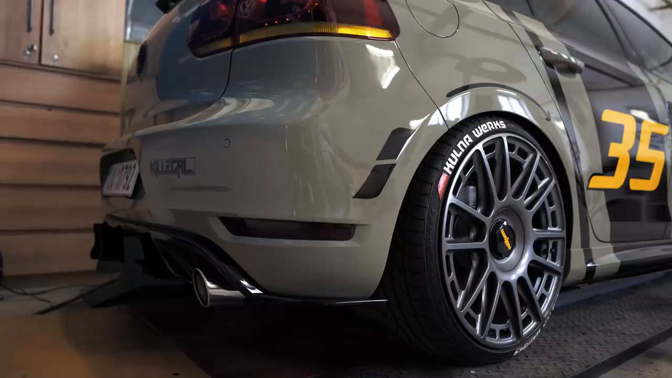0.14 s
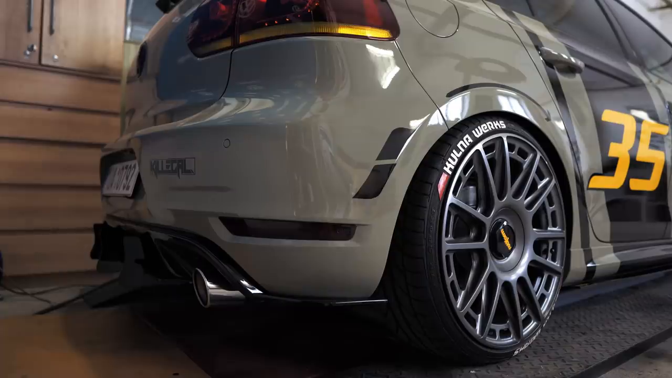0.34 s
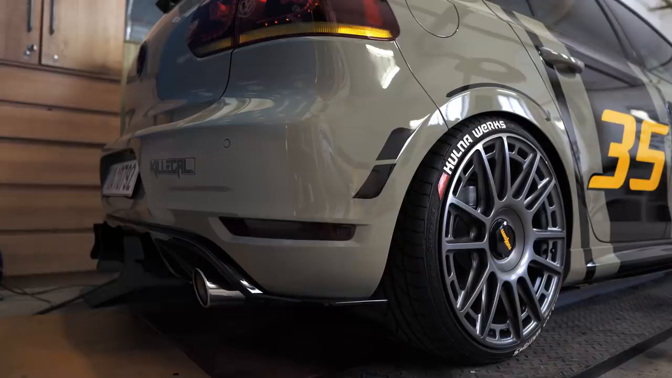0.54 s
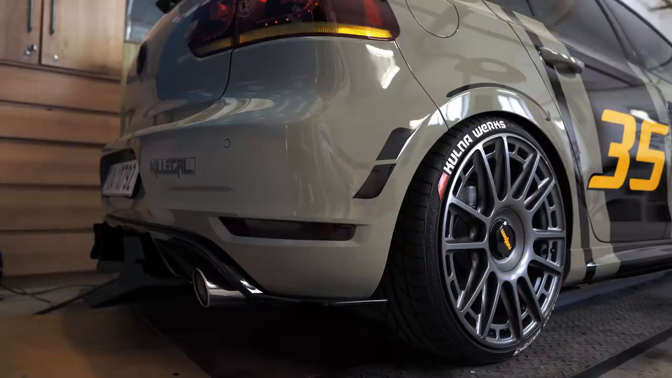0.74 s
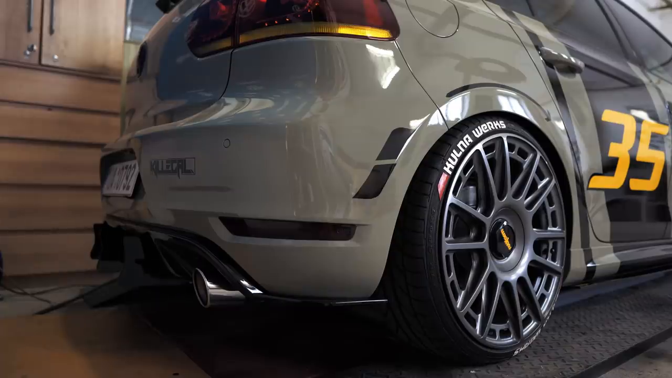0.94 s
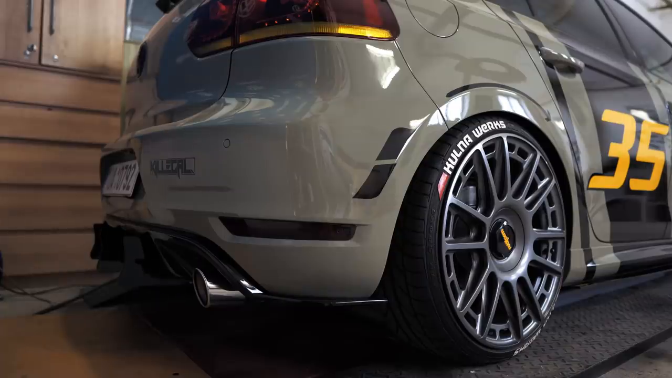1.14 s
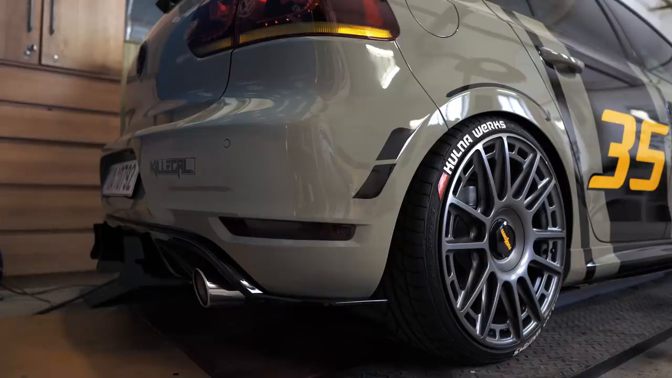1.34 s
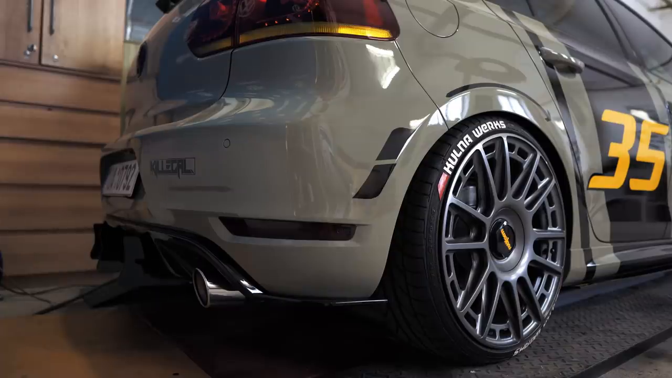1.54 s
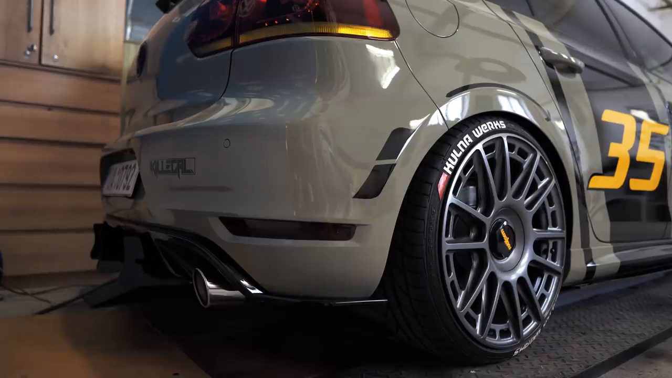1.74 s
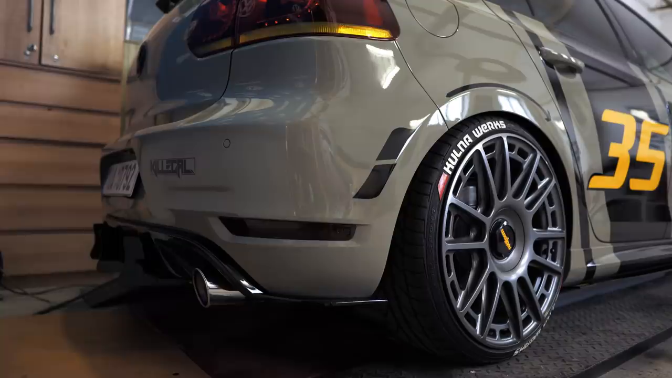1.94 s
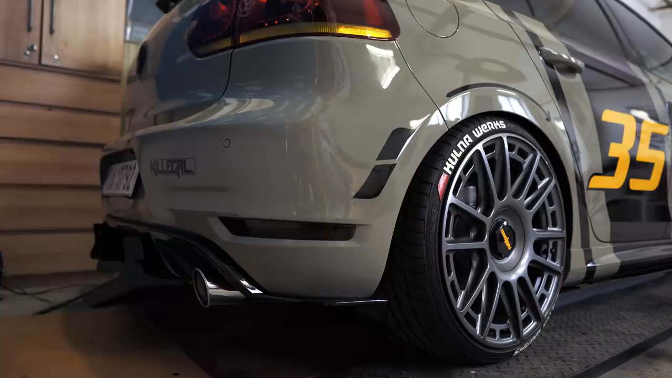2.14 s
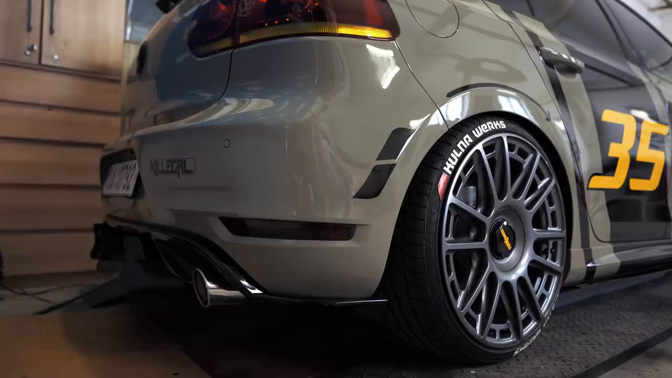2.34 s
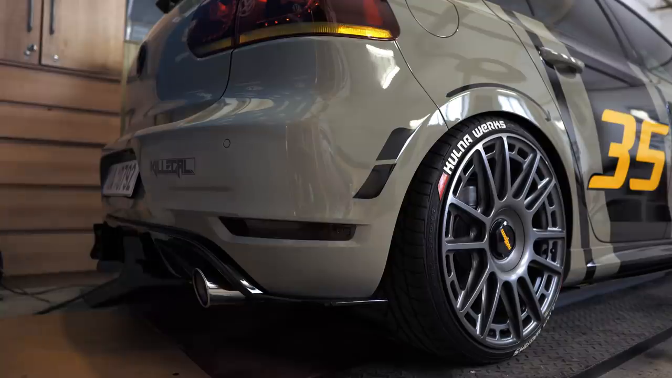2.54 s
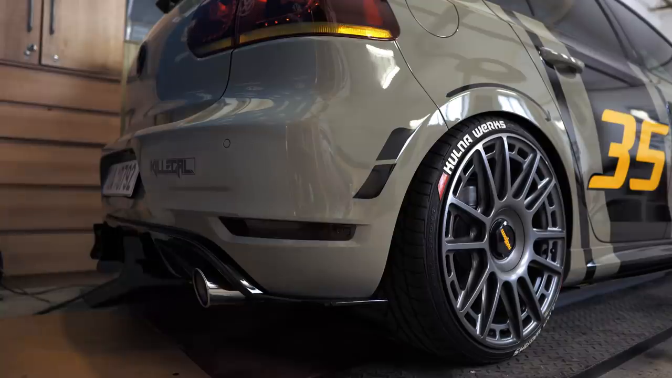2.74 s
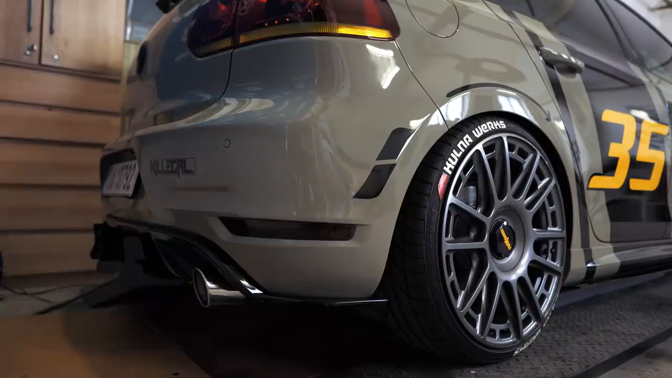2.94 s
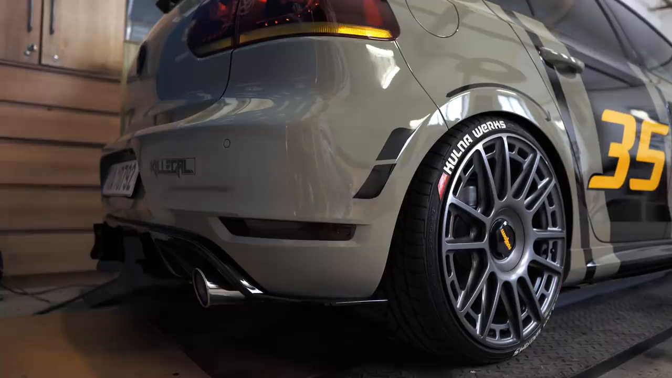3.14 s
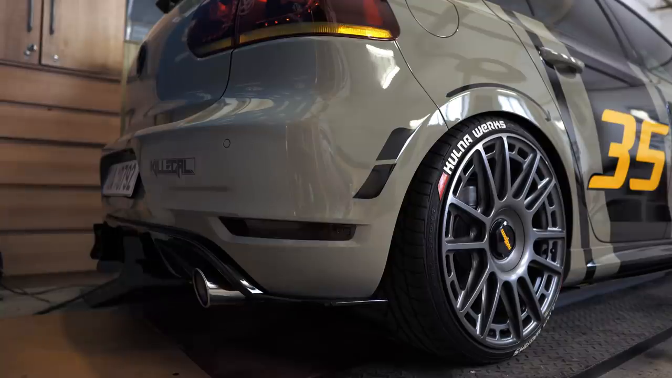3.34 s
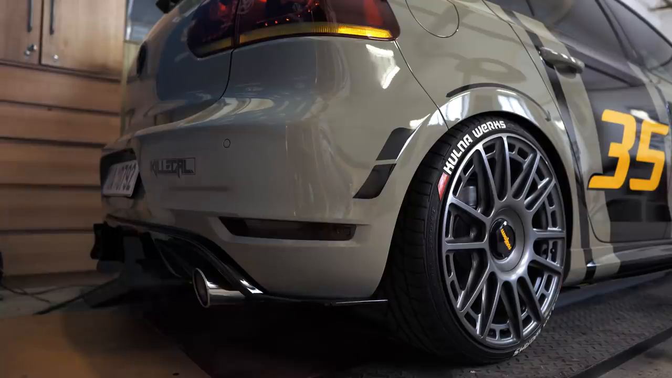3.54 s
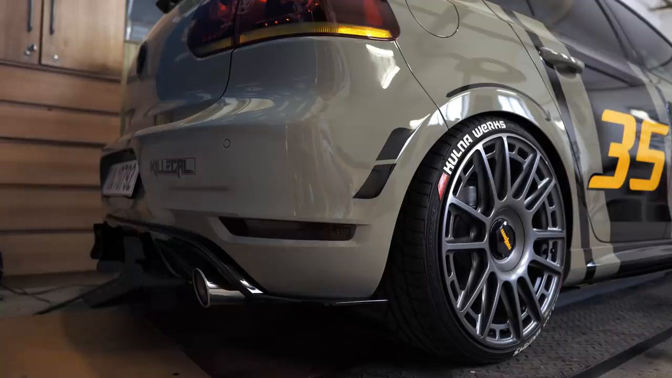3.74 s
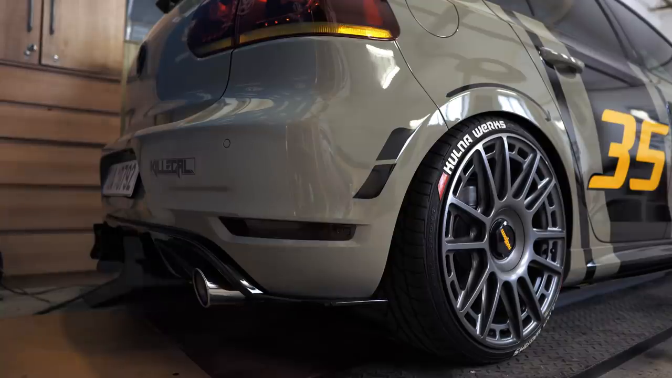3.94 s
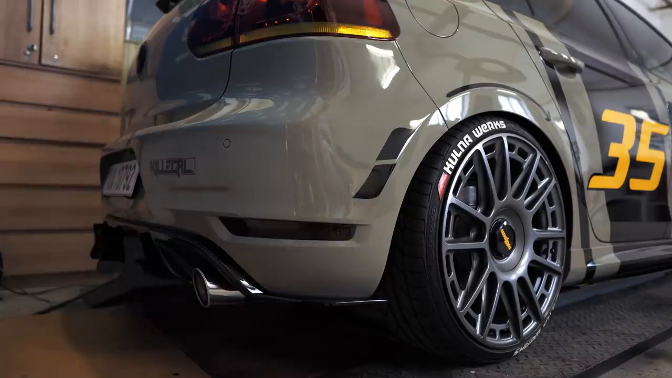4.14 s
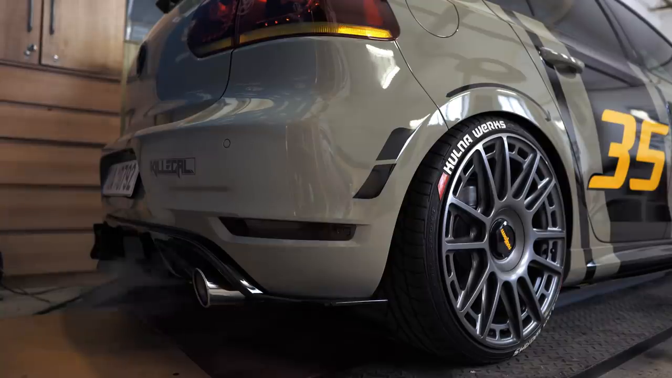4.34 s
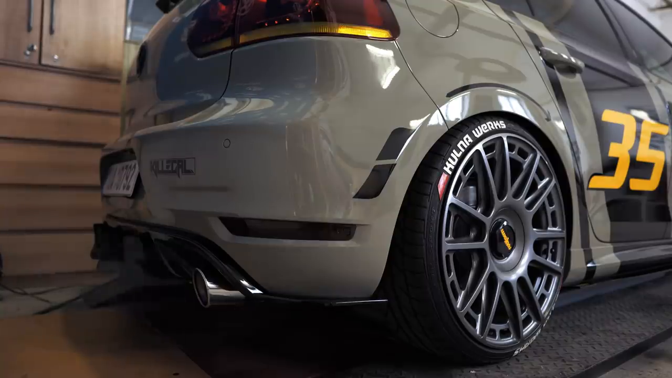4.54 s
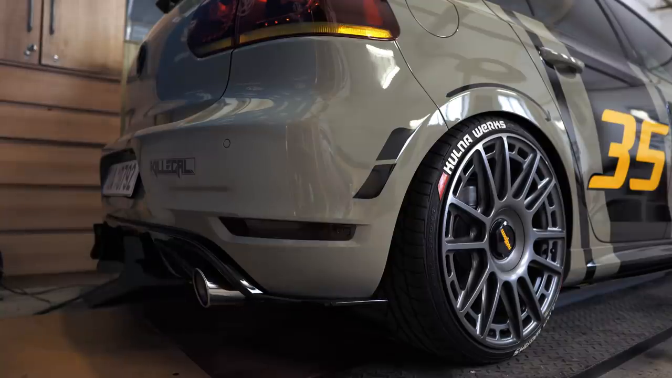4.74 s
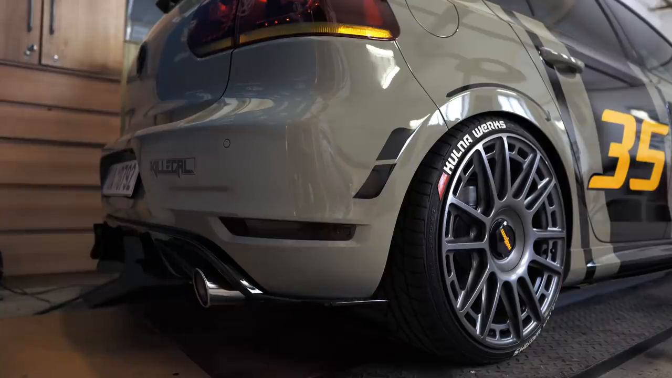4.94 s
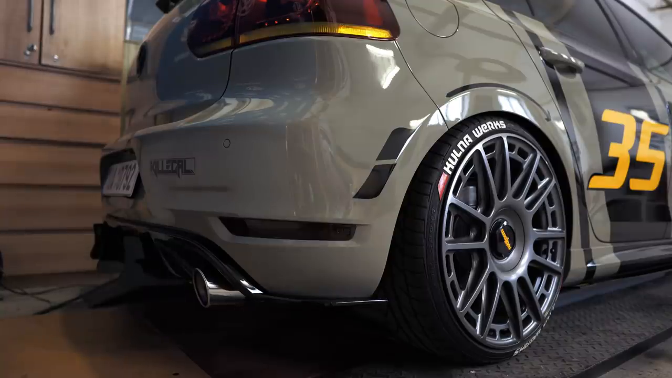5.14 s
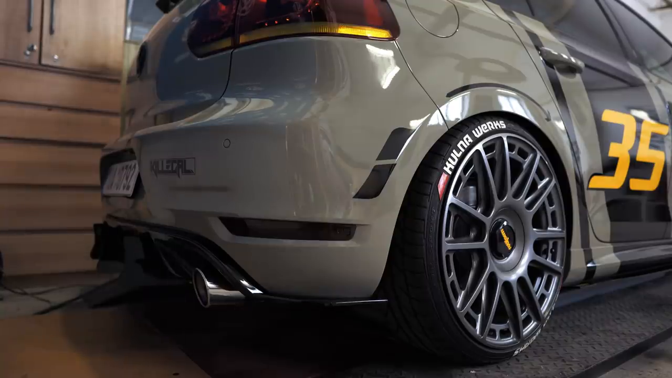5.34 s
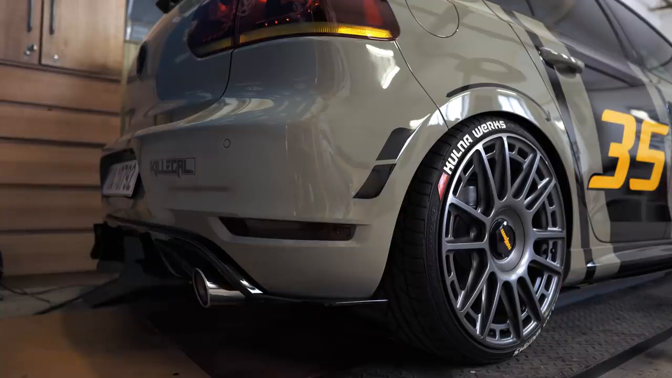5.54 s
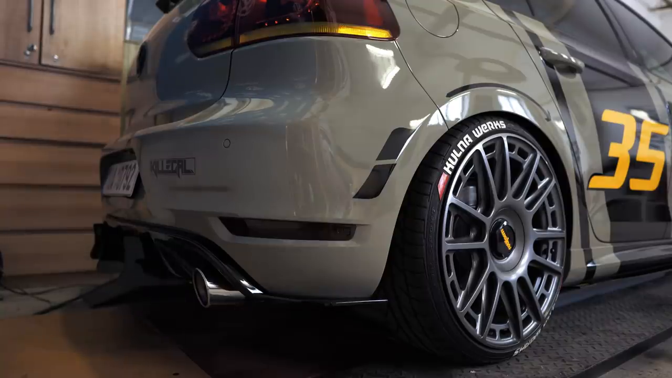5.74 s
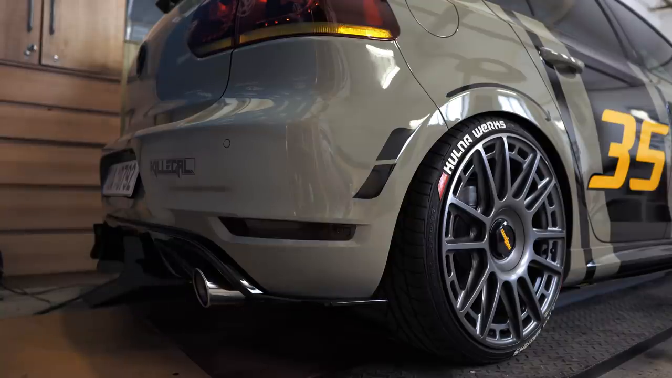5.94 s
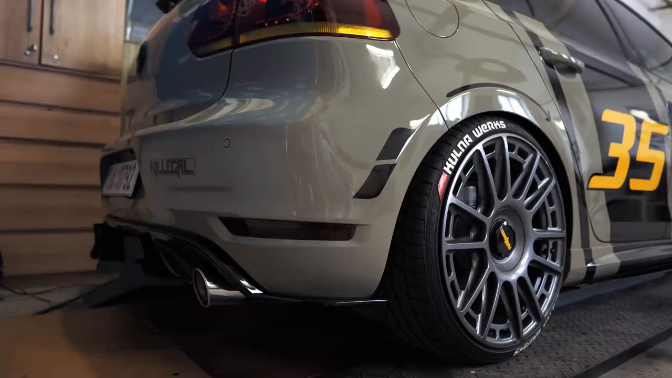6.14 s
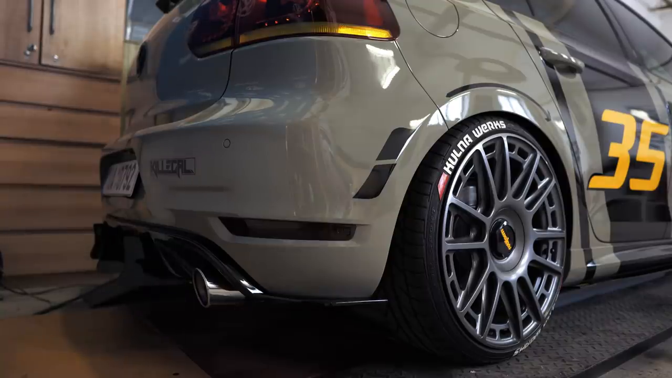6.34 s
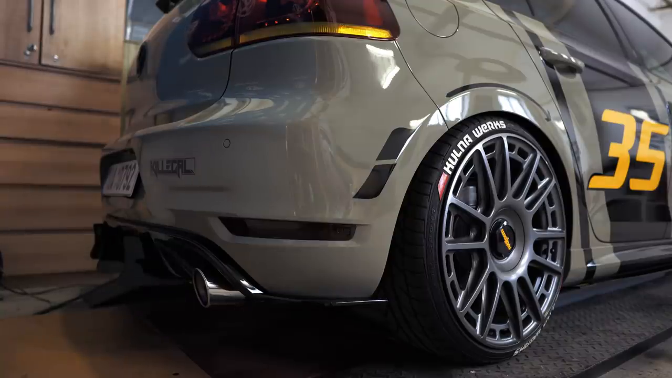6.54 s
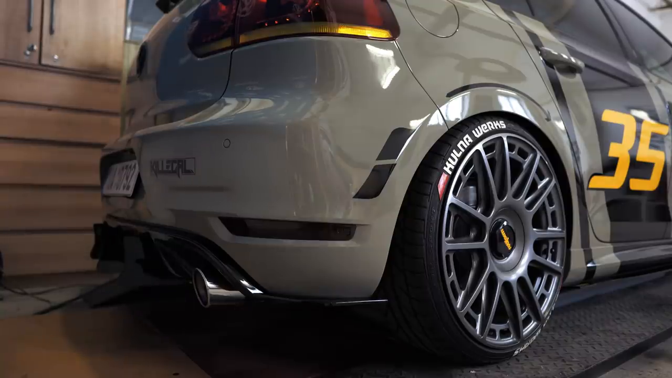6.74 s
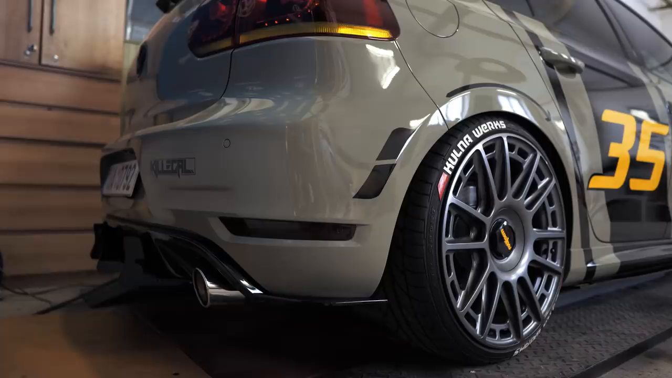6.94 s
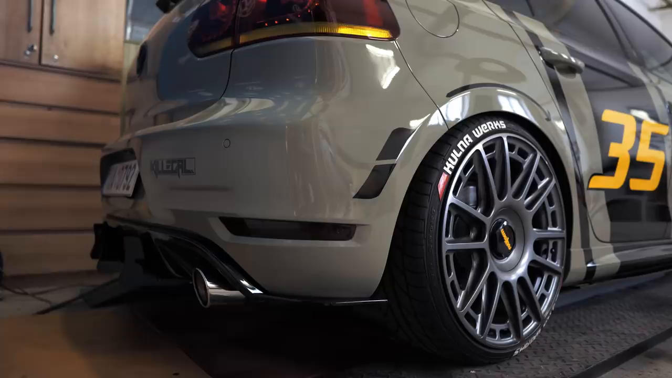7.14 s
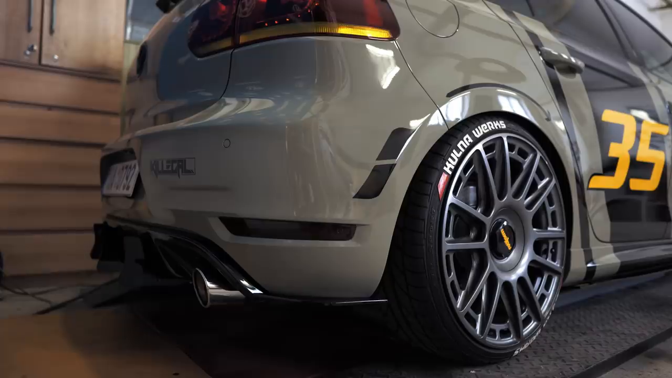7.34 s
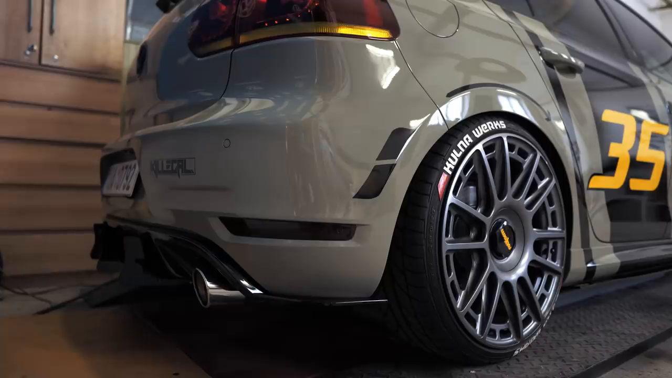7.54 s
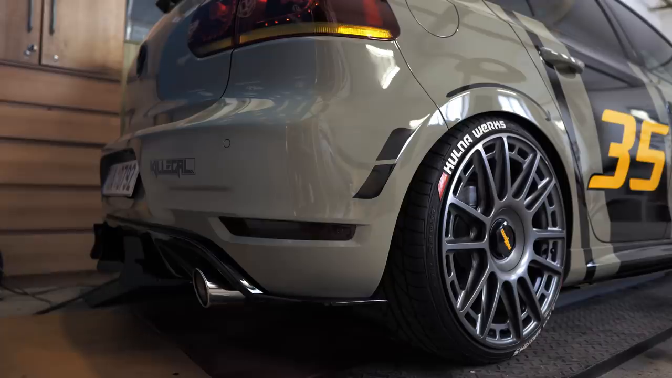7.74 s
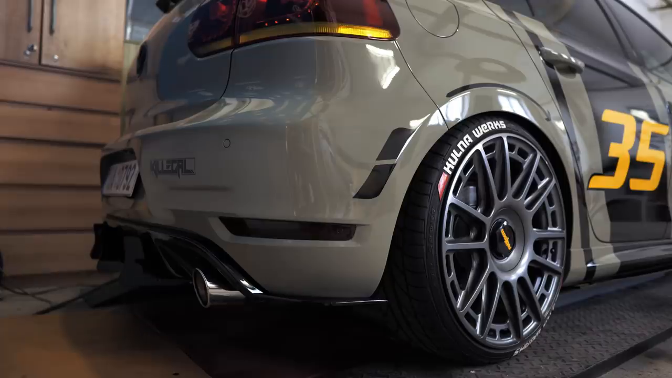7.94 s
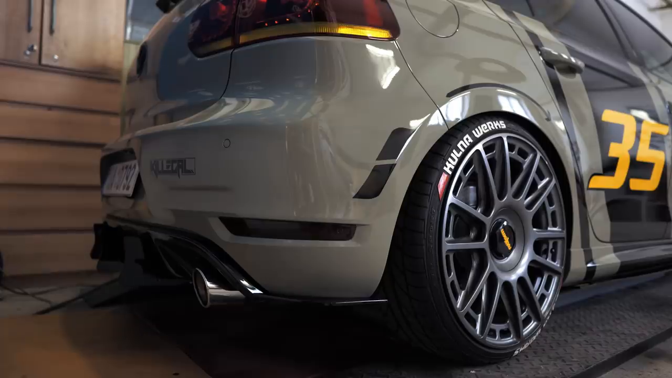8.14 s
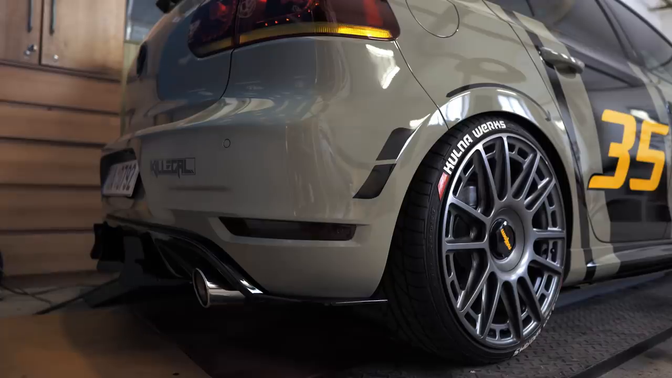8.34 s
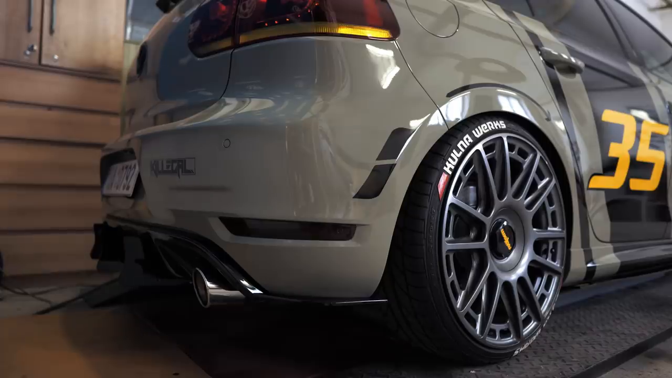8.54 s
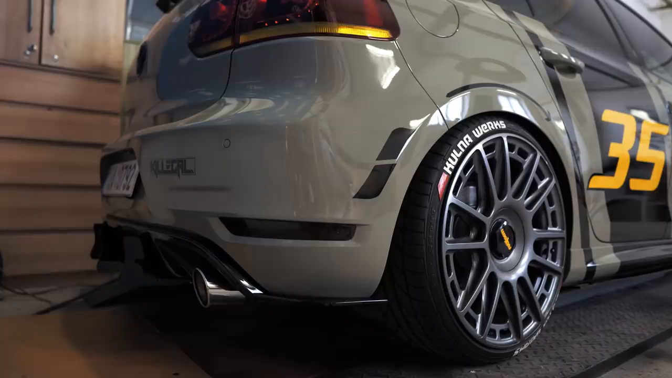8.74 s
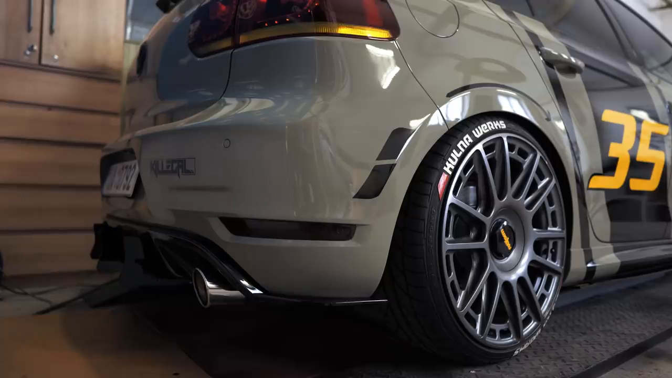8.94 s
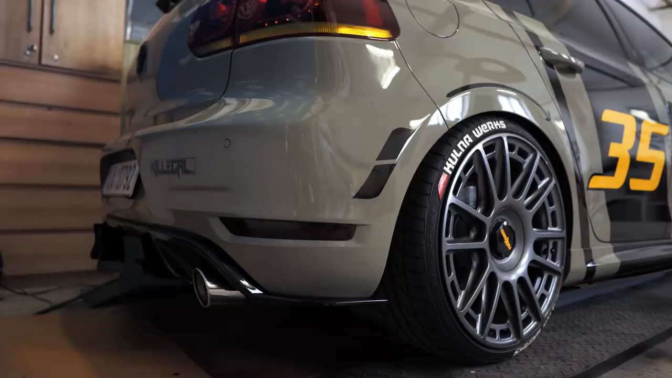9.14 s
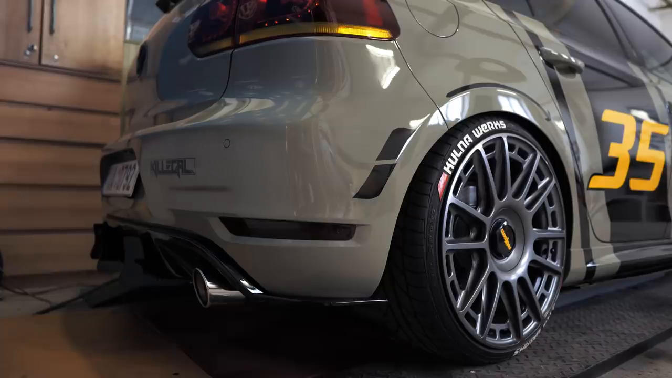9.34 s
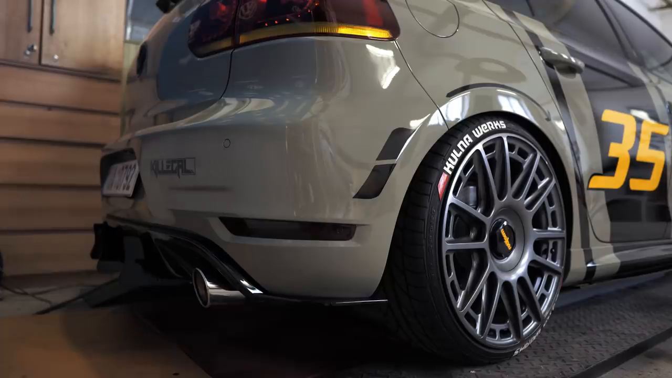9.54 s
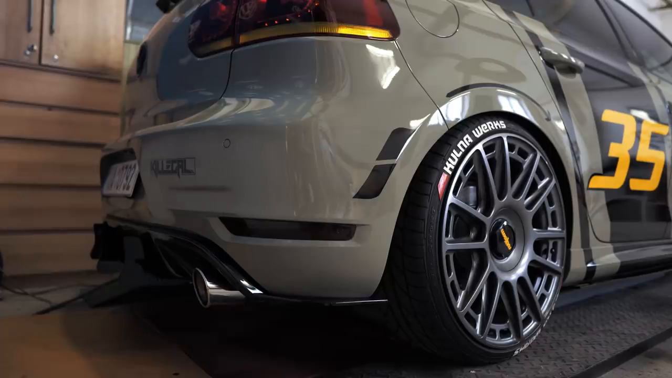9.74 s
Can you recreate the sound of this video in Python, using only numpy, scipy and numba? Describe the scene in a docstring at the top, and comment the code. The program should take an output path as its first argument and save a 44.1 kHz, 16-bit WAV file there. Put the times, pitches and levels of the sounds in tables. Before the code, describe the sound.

Close to a car's tailpipe in a walled yard, a four-cylinder engine is already falling from a rev, buzzing low with thin hiss and injector ticks. At 0.5 s a blip climbs raspily until 0.9, then sinks through burbles and dull pops around 1.1-1.5. At 1.85 the hardest blip surges much higher, growling and spitting sharp cracks at 2.3-2.5, then coasts smoother and softer. At 3.25 a huge backfire bangs, overloading the microphone; flame roars and flutters briefly and the echo fades over about a second beneath muffled pops. A gentler blip at 4.25-4.65 falls unevenly, another follows at 5.75-6.15 with stumbling crackles until 7. The engine settles into a low, slightly lumpy idle, sagging slowest near 8.4. A last blip at 8.65-9.05 rises, then burbles and pops downward to 10 s.

```python
"""Blipped turbo car with a backfire

A turbocharged four-cylinder car stands in a yard and is blipped five times, heard near its tailpipe.
Each firing rings the exhaust and lets out a puff of gas; off the throttle firings stumble and fuel pops.
One backfire bangs, flames and echoes round the yard, driving a limiter; between blips the engine sinks
towards idle. Gas hiss and ticking injectors fill the treble, and the walls return a soft, thin echo."""
import sys
import numpy as np
from scipy import signal
from scipy.fft import rfft, irfft
from scipy.io import wavfile
from scipy.ndimage import uniform_filter1d
from numba import njit

SR = 44100
rng = np.random.default_rng(int(sys.argv[2]) if len(sys.argv) > 2 else 0)


def log_audio(samples):
    """Write samples as a 16-bit WAV file to the path given in sys.argv[1]."""
    # one column per channel
    frames = np.atleast_2d(samples).T
    # limit to full scale, then quantise
    limited = np.clip(frames, -1, 1)
    pcm = np.round(limited * 32767).astype(np.int16)
    wavfile.write(sys.argv[1], SR, pcm)


N = 436590
T = np.arange(N) / SR  # time of each sample, s

# pedal blips, the first already over: (pressed [s], lifted [s], top firing rate before smoothing [Hz],
# coasting time constant [s], harshness climbing [dB], harshness coasting [dB], extra boom [dB])
BLIPS = [(-.5, -0.109, 66.64, 1.58, 3, 3.5, 2), (.487, 0.918, 85.9, 1.23, 2, 2, 1.5),
         (1.842, 2.338, 117.2, 1.68, 2, -5.5, -0.5), (4.252, 4.643, 69.87, 1.69, -2.5, 0, -1),
         (5.732, 6.164, 81.3, 1.29, 0.5, 0, 0), (8.645, 9.059, 82.52, 1.55, 1, 0.5, 1)]
# idle speed at which the governor catches the engine: (time [s], firing rate [Hz])
IDLE = [(.35, 51.98), (1.7, 51.18), (4.15, 44.35), (5.2, 48.3), (5.55, 45.56), (7.15, 44.79), (7.63, 42.63),
        (8.15, 37.13), (8.45, 36.76), (8.6, 41.8)]
# overrun, when fuel burns late and the firings stumble: (start [s], end [s], depth [0-1])
OVERRUNS = [(1.05, 1.66, 0.72), (2.36, 2.56, .7), (3.3, 4.13, 0.8), (4.83, 5.18, 0.77), (6.26, 7.09, .85),
            (9.2, 10, .75)]
# the cylinders get hardly any charge and the note goes soft: (start [s], end [s], depth [0-1])
FUEL_CUTS = [(.38, .52, 0.28), (1.6, 1.8, 0.73), (3.3, 3.58, 0.45), (4.08, 4.3, 0.37), (6.82, 7.19, 0.41),
             (9.22, 10, 0.32)]
# unevenness of combustion: (base [0-1], added on throttle [0-1], added in overrun [0-1])
STUMBLE = (0.13, -0.031, 0.79)

# voice levels relative to one another: (level at the reference firing rate [dB],
# growth with speed [dB/octave], on throttle [dB], in overrun [dB], in a fuel cut [dB], per harshness [dB/dB])
BARK_LEVEL = (-19.5, 5, 0, -4.5, -6, 1.11)
RASP_LEVEL = (-33.5, 9, 1, -2.5, -12, 1.37)
HISS_LEVEL = (-44, 12, 0.37, -4, -1, 0.63)
TICK_LEVEL = (-51, 4, 1, -2.5, -15, 0.8)
# boom where a harmonic of the firings meets a resonance: (firing rate [Hz], relative level [dB])
DRONE = [(36.5, -16), (42, -14), (47, -12), (53, -11), (60, -15), (68, -8), (75, -11), (82, -11.5),
         (97, -7.5), (117, -6.5)]
# departure of the boom from the drone: (on throttle [dB], in overrun [dB], in a fuel cut [dB])
BOOM_SHIFT = (-1, -6.5, -8)

# exhaust resonances, from silencer volume to tailpipe: (frequency [Hz], width [Hz], relative level [dB])
SILENCER = [(43, 6.4, 5.5), (62, 25, 5.5), (84.3, 22, 13), (98.6, 4.1, 8)]
PIPE = [(132, 47, 2.5), (205.8, 20, 5), (232.5, 52, 1), (288.2, 16.2, 8.5), (330.9, 18.8, 8.5)]
TAILPIPE = [(425, 6, -13), (455.4, 24.6, 9.5), (524, 20, 3.5), (569, 49, 5.5), (615, 42, 9.5),
            (656, 19, 1.5), (721.5, 17, 8), (872, 34, -4), (943, 37, -3), (1001, 17, -7), (1244, 59, -11),
            (1480, 130, -10), (1586, 140, -12), (2080, 430, -4.5)]
# ringing of the injectors: (frequency [Hz], width [Hz], relative level [dB])
INJECTORS = [(3280, 1800, 6), (4240, 1400, -16), (5400, 260, 3), (6650, 280, -20), (8700, 420, 2),
             (9800, 300, -10), (12000, 1200, -8)]
# colour of the escaping gas: (frequency [Hz], relative level [dB])
HISS_COLOUR = [(1120, 3), (1900, -1), (2710, -3), (2960, -1.5), (3290, -3.5), (3990, -2), (4930, -7.5),
               (5490, -6.5), (5990, -8.5), (6600, -8.5), (7880, -10.5), (8840, -11.5), (10900, -20.5),
               (12700, -18.5), (15700, -24)]

# fuel popping in the exhaust: (time [s], relative thump [dB], relative crack [dB])
POPS = [(0.103, -23, -49), (0.815, -8.5, -33), (0.853, -14, -51), (1.063, -8.5, -45), (1.084, -15, -51),
        (1.171, -10.5, -50), (1.287, -4.5, -30.5), (1.48, -12, -50), (2.315, 7.5, -17.5), (2.345, -2, -25),
        (2.44, -1, -17.5), (2.526, -3.5, -21), (3.633, -9.5, -39), (3.736, -12.5, -72), (3.969, -18, -80),
        (4.012, -9.5, -40), (4.059, -20.5, -45), (4.377, -18, -56), (4.955, -24, -46), (5.099, -26, -42),
        (5.855, -18, -53), (6.301, -15, -54), (6.385, -18, -49), (6.488, -16.5, -41.5), (6.548, -16.5, -50),
        (6.729, -16, -49), (6.767, -11.5, -47), (8.791, -12.5, -40), (9.026, -9, -34), (9.271, -10, -56),
        (9.314, -11, -54), (9.373, -13.5, -52), (9.494, -11.5, -54)]
# the backfire: (time [s], relative level [dB])
BACKFIRE = (3.2497, 5.95)
# colour of the backfire and its echo: (frequency [Hz], relative level [dB])
BANG_COLOUR = [(88, -37), (150, 12.5), (193, 6.5), (226, -17), (269, 10.5), (308, 3), (428, 0.5),
               (670, 3.5), (1010, -4), (1700, -3), (2030, -8), (8220, -27.5), (12400, -26), (15600, -25)]
# dying away of the yard's echo: (frequency [Hz], time to fall 60 dB [s])
YARD_DECAY = [(100, 0.2), (500, 1), (1500, 1.0), (4000, 1), (8000, 0.98), (15000, 0.24)]

REFERENCE_HZ = 50  # firing rate at which the voice levels are set
FLYWHEEL_S, PEDAL_LEAD_S = 0.1475, 0.013  # smoothing of speed; load leads speed
PEDAL_S, MIXTURE_S = 0.19, 0.11  # slew of pedal and of fuelling
# near this firing rate and below, the firings come early and late by turns
LOPE_HZ, LOPE_S = 45.2, 0.00018
# turbulence in the tailpipe at the reference rate, and its growth with speed
CHURN_SHARE, CHURN_DB_PER_OCTAVE = 0.29, 7
# at the top of the highest blip a volley of late burns makes the pipes growl
VOLLEY_S, VOLLEY_BARK_DB, VOLLEY_RASP_DB = (2.32, 2.52), 8, 14  # (start, end), added levels
TOP_HZ = 15750  # final treble cutoff


def engine():
    """Firings ring silencer, pipe and tailpipe; a puff of turbulent gas follows each one."""
    hz, stumble, boom_db, bark_db, rasp_db, hiss_db, tick_db = controls()
    times, sizes, fronts = firings(hz, stumble, late=0.348, scatter_db=8.5, steady_db=3)
    pulses = unit(strikes(times, sizes))
    edges = unit(strikes(times, fronts))
    puffs = unit(fade(edges, decay_s=0.012))
    churn = unit(puffs * rng.standard_normal(N))
    # uneven burning adds turbulence to the clean pulses
    turbulence = (0.02 + stumble) * churn

    # the fronts are rounded, so the highest resonances are rung mostly by turbulence
    front_s = 0.00064
    rounded = fade(edges, decay_s=front_s) / (front_s * SR)
    churn_gain = CHURN_SHARE * undb(CHURN_DB_PER_OCTAVE * np.log2(hz / REFERENCE_HZ))
    rush = rounded + churn_gain * churn + 0.35 * turbulence

    silencer = body(SILENCER, low_hz=32.3, high_hz=108.3)
    pipe = body(PIPE, low_hz=154.2, high_hz=358.2, order=6)
    tailpipe = body(TAILPIPE, low_hz=377, high_hz=1706, order=5)
    boom = even(ring(pulses + turbulence, silencer), size=3600, hold=0.52)
    bark = even(ring(edges + turbulence, pipe), hold=0.41)
    rasp = even(ring(rush, tailpipe))
    exhaust = boom * undb(boom_db) + bark * undb(bark_db) + rasp * undb(rasp_db)

    hiss = even(noise(HISS_COLOUR, size=2 ** 19) * (1 + 0.067 * puffs))
    hiss = hiss * undb(hiss_db - 1.0) * share(hiss_db)
    return hiss + injectors(times) * undb(tick_db) - exhaust


def firings(hz, stumble, late, scatter_db, steady_db):
    """Firing times and strengths; stumbling shifts and scatters them, and a slow engine lopes."""
    turns = np.cumsum(hz) / SR  # firings so far
    count = np.arange(1, int(turns[-1]))
    chance = rng.standard_normal((len(count), 3)).T
    rough = np.clip(np.interp(count, turns, stumble), 0, 1)
    slack = np.minimum(LOPE_HZ / np.interp(count, turns, hz), 1)
    times = np.interp(count + late * rough ** 2 * np.tanh(chance[0]), turns, T)
    times = times + LOPE_S * slack ** 4 * (-1) ** count
    sizes = undb(scatter_db * rough * np.tanh(chance[1]))
    # the steepness of the front varies more than the volume of gas does
    fronts = sizes * undb((steady_db * slack + 1.2 * rough) * np.tanh(chance[2]))
    return times, sizes, fronts


def controls():
    """Pedal and fuelling set speed, stumbling and the levels of boom, bark, rasp, hiss and ticking."""
    hz, harsh_db, extra_db = revs()
    presses = [(pressed - PEDAL_LEAD_S, lifted, 1) for pressed, lifted, *_ in BLIPS]
    throttle = gate(presses, PEDAL_S)
    overrun, cut = gate(OVERRUNS, MIXTURE_S), gate(FUEL_CUTS, MIXTURE_S)

    octaves = np.log2(hz / REFERENCE_HZ)
    state = np.array([np.ones(N), octaves, throttle, overrun, cut, harsh_db])
    levels = np.array([BARK_LEVEL, RASP_LEVEL, HISS_LEVEL, TICK_LEVEL])
    bark_db, rasp_db, hiss_db, tick_db = levels @ state
    drone_db = np.interp(hz, *np.transpose(DRONE))
    boom_db = drone_db + extra_db + np.array(BOOM_SHIFT) @ np.array([throttle, overrun, cut])

    base, on_throttle, in_overrun = STUMBLE
    stumble = np.clip(base + on_throttle * throttle + in_overrun * overrun, 0, 1)
    volley = gate([(*VOLLEY_S, 1)], PEDAL_S / 2)
    bark_db = bark_db + VOLLEY_BARK_DB * volley
    rasp_db = rasp_db + VOLLEY_RASP_DB * volley
    return hz, stumble, boom_db, bark_db, rasp_db, hiss_db, tick_db


def revs():
    """Speed, harshness and extra boom: each blip climbs steadily, then coasts until idle catches it."""
    idle = np.interp(T, *np.transpose(IDLE))
    hz, harsh_db, extra_db = idle, np.zeros(N), np.zeros(N)
    for pressed, lifted, top_hz, coast_s, climb_db, coast_db, boom_db in BLIPS:
        start_hz = np.interp(pressed, T, hz)
        climb = np.interp(T, [pressed, lifted], [start_hz, top_hz])
        coast = np.maximum(idle, top_hz * np.exp(-np.maximum(T - lifted, 0) / coast_s))
        before, climbing = T < pressed, T < lifted
        hz = np.where(before, hz, np.where(climbing, climb, coast))
        harsh_db = np.where(before, harsh_db, np.where(climbing, climb_db, coast_db))
        extra_db = np.where(before, extra_db, boom_db)
    return smooth(hz, FLYWHEEL_S), smooth(harsh_db, FLYWHEEL_S), smooth(extra_db, FLYWHEEL_S)


def gate(rows, slew_s):
    """A control that rises to each row's depth at its start and falls at its end."""
    ramp = lambda t: np.clip(t / slew_s + 0.5, 0, 1)
    return sum(depth * ramp(T - start) * ramp(end - T) for start, end, depth in rows)


def injectors(times):
    """Bright ticking from the engine bay, blurred on its way round the car."""
    envelope = unit(fade(strikes(times, np.ones(len(times))), decay_s=0.0088))
    ticks = (0.45 + envelope) * rng.standard_normal(N)
    return even(ring(ticks, body(INJECTORS, low_hz=2400, high_hz=12800, order=2)))


def share(hiss_db, knee_db=-51):
    """Gain that holds gas hiss back below the knee and lets it into the treble in strong flow."""
    return 1 / np.sqrt(1 + undb(2 * (knee_db - hiss_db)))


def pops(thump_db, tail_db, crack_db, snap_db, whump_db):
    """Each pop strikes the whole exhaust; the fierce ones also spit a crack of gas and a low whump."""
    s, thump, crack = np.transpose(POPS)
    pipe = body(PIPE, low_hz=132, high_hz=438, order=2)
    tailpipe = body(TAILPIPE, low_hz=380, high_hz=1300, order=3)
    drive, slug = burn(s + 0.002032, thump + thump_db, burn_s=0.006, roar_db=-23.5, slug_db=0.5)
    thumps = ring(drive, pipe + undb(tail_db) * tailpipe) + slug

    # the weak ones burn out deep in the pipe
    spits = strikes(s + 0.0011, undb(crack) * share(crack, knee_db=-46.5))
    whump = ring(spits, body(SILENCER, low_hz=22, high_hz=51.7, order=2))
    snap_colour = [(400, 6), (1400, -6), (3500, -8), (7000, -13.5), (15000, -38)]  # (Hz, dB)
    snap = fade(spits, decay_s=0.0026) * noise(snap_colour, size=2 ** 19)
    spray = fade(spits, decay_s=0.022) * noise(HISS_COLOUR, size=2 ** 19)
    return undb(snap_db) * snap + undb(crack_db) * spray + undb(whump_db) * whump - thumps


def burn(s, db, burn_s, roar_db, slug_db):
    """A pop drives the pipes with a blow and brief turbulence; a rounded slug of gas leaves them."""
    blows = strikes(s, undb(db))
    drive = blows + undb(roar_db) * fade(blows, burn_s) * rng.standard_normal(N)
    band = signal.butter(2, [75, 800], "bandpass", fs=SR, output="sos")
    slug = signal.sosfilt(band, fade(blows, decay_s=0.00067))
    return drive, undb(slug_db) * slug


def backfire(blast_db, blast_s, bright_db):
    """A bright blast at the outlet, with the yard's long echo."""
    s, db = BACKFIRE
    tail = echo_tail(BANG_COLOUR)
    t = T[:len(tail)]
    crack_colour = [(800, -1), (3000, 6), (9000, -4.5), (15000, -7)]  # (Hz, dB)
    crack = undb(bright_db) * noise(crack_colour, len(t))
    blast = (noise(BANG_COLOUR, len(t)) + crack) * np.exp(-t / blast_s)
    return ring(strikes(np.array([s]), undb(db - 9.0)), tail + undb(blast_db) * blast)


def flame(swell_s, roar_db, flutter_db):
    """After the bang the burning gas roars out of the tailpipe, swelling, fluttering and dying away."""
    age = np.maximum(T - BACKFIRE[0], 0) / swell_s
    swell = (age * np.exp(1 - age)) ** 4
    roar_colour = [(200, -19), (600, -2), (1000, 4), (2000, -2), (4000, -32), (15000, -34)]  # (Hz, dB)
    roar = noise(roar_colour, size=2 ** 19)
    flutter = unit(smooth(rng.standard_normal(N), 0.008))
    return undb(roar_db + flutter_db * flutter) * swell * roar


def yard(x, wet_db):
    """The walls send back a soft, thin echo."""
    tail = echo_tail([(60, -52), (250, 4.5), (700, 4.5), (4000, -8.0), (15000, -0.5)])  # (Hz, dB)
    tail = tail * (1 - np.exp(-T[:len(tail)] / 0.0014))  # soft onset
    return x + undb(wet_db) * ring(x, tail / np.sqrt(np.sum(tail ** 2)))


def echo_tail(spectrum, size=65536):
    """Diffuse echo: noise dying at its own pace in each band, lowest bass and highest treble soonest."""
    hz, t, cells = signal.stft(noise(spectrum, size), SR, nperseg=256)
    cells = cells * np.exp(-np.log(1000) * t / along(YARD_DECAY, hz)[:, None])
    return signal.istft(cells, SR)[1][:size]


def body(modes, low_hz, high_hz, order=4, size=8192):
    """Impulse response of damped resonances within the band that the part radiates, with peak 1."""
    t = T[:size]
    response = np.zeros(size)
    for hz, width, db in modes:
        # a narrower resonance rings longer
        response += undb(db) * width * np.exp(-np.pi * width * t) * np.cos(2 * np.pi * hz * t)
    band = signal.butter(order, [low_hz, high_hz], "bandpass", fs=SR, output="sos")
    response = signal.sosfilt(band, response)
    return response / np.abs(response).max()


def ring(x, response):
    """Pass a sound through an impulse response."""
    return signal.oaconvolve(x, response)[:N]


def strikes(times, sizes):
    """A pulse at each time, shared between two neighbouring samples."""
    at = np.clip(times * SR, 0, N - 2)
    i, part = at.astype(int), at % 1
    return np.bincount(i, sizes * (1 - part), N) + np.bincount(i + 1, sizes * part, N)


def fade(pulses, decay_s):
    """Each pulse starts an envelope that dies away exponentially."""
    return signal.lfilter([1], [1, -np.exp(-1 / (decay_s * SR))], pulses + 1e-12)


def noise(spectrum, size):
    """Noise with the given colour, scaled to an rms of 1 over its full size."""
    hz = np.arange(size // 2 + 1) * SR / size
    coloured = rfft(rng.standard_normal(size)) * undb(along(spectrum, hz))
    return unit(irfft(coloured))[:N]


def along(points, hz):
    """Read a (Hz, value) table on a log-frequency axis."""
    f, value = np.transpose(points)
    return np.interp(np.log(hz + 1), np.log(f), value)


def even(x, size=5000, hold=1):
    """Pull the slow level towards 1 (fully at hold 1), leaving single beats free."""
    x = unit(x)
    power = uniform_filter1d(uniform_filter1d(x ** 2, size), size // 2)
    return x / (np.abs(power) + 1e-6) ** (np.clip(hold, 0, 1) / 2)


def smooth(x, span_s):
    """Moving average over the given time."""
    return uniform_filter1d(x, max(int(span_s * SR), 1), mode="nearest")


def unit(x):
    """Scale to an rms of 1."""
    return x / np.sqrt(np.mean(x ** 2))


def undb(db):
    """Decibels to gain."""
    return 10 ** (np.asarray(db) / 20)


def scene():
    """Engine and pops in the yard, and the one big backfire with its flame."""
    popping = dict(thump_db=1, tail_db=-3.5, crack_db=4.0, snap_db=8, whump_db=12.5)
    car = yard(engine() + pops(**popping), wet_db=-10.5)
    bang = backfire(blast_db=5.5, blast_s=0.013, bright_db=-7)
    fire = flame(swell_s=0.12, roar_db=-24, flutter_db=7)
    return (car + bang + fire)[None]


def flatten(x, top):
    """Flat tops where the sound passes the given height."""
    return x / (1 + (x / top) ** 8) ** (1 / 8)


@njit
def follow(x, attack, release):
    """Level follower: quick to rise, slow to fall."""
    out, e = np.empty(len(x)), 0.
    for i in range(len(x)):
        e += (abs(x[i]) - e) * (attack if abs(x[i]) > e else release)
        out[i] = e
    return out


def limiter(x, ceiling_db, attack_s, release_s):
    """Turn the gain down while the followed power passes the ceiling."""
    power = follow(x ** 2, 1 / (attack_s * SR), 1 / (release_s * SR))
    return x / np.maximum(1, np.sqrt(power) / undb(ceiling_db))


def record(dry):
    """The microphone overloads, a limiter pulls the level down, peaks flatten and the top is cut."""
    overloaded = flatten(dry[0], top=1.3)
    held = limiter(overloaded, ceiling_db=-3.4, attack_s=0.003, release_s=0.055)
    treble_cut = signal.ellip(8, 0.2, 70, TOP_HZ, fs=SR, output="sos")
    return signal.sosfilt(treble_cut, flatten(held, top=0.85))[None]


dry = scene()
out = record(dry)
log_audio(out)
```